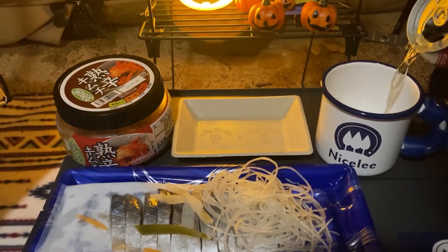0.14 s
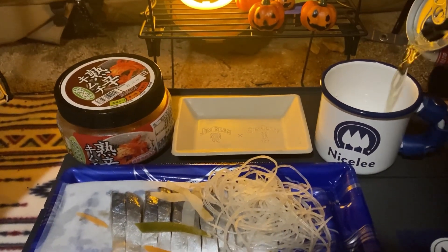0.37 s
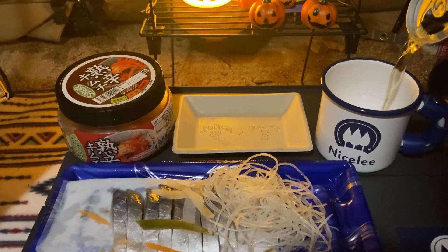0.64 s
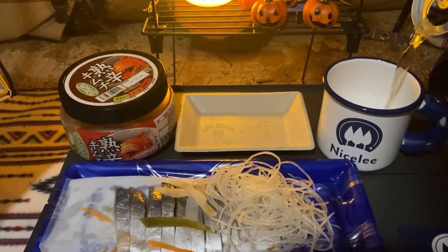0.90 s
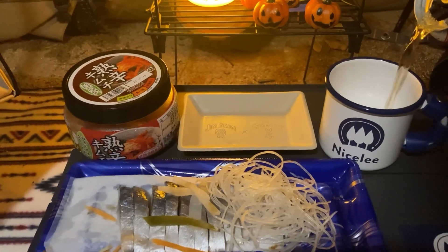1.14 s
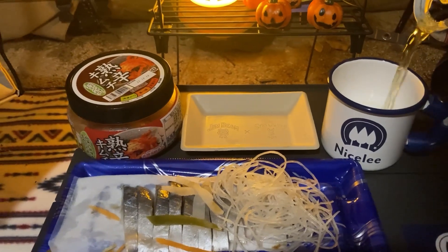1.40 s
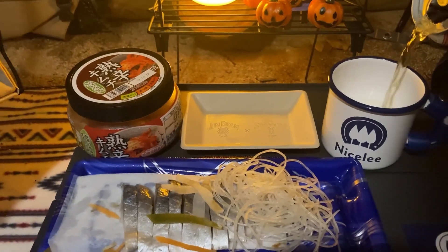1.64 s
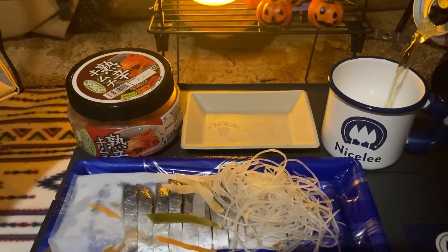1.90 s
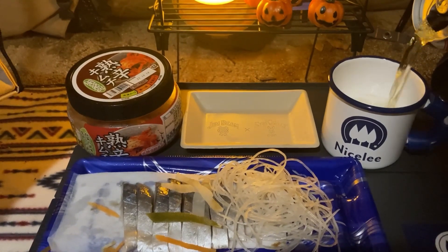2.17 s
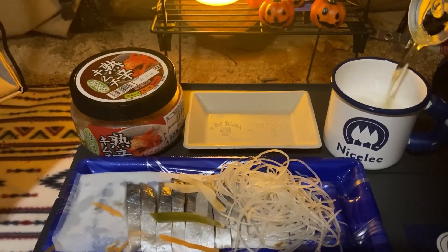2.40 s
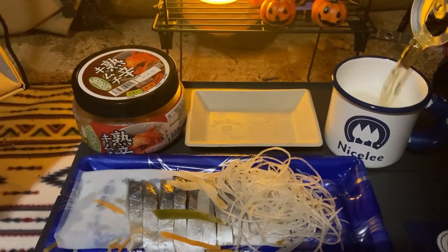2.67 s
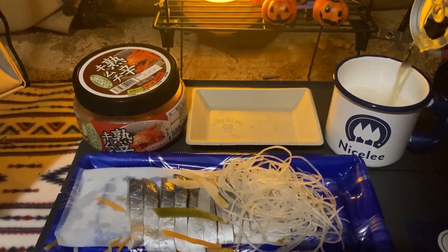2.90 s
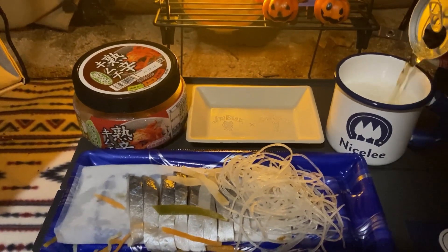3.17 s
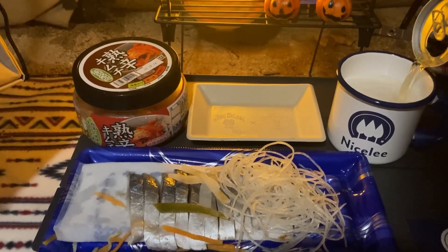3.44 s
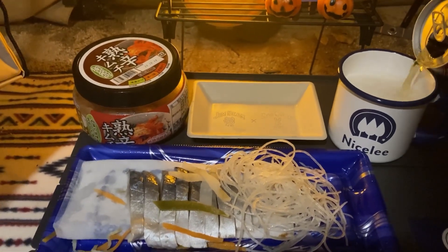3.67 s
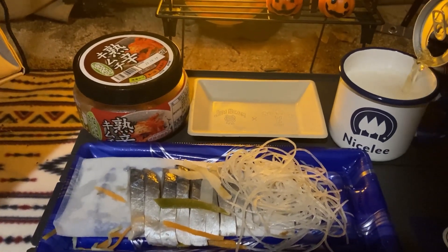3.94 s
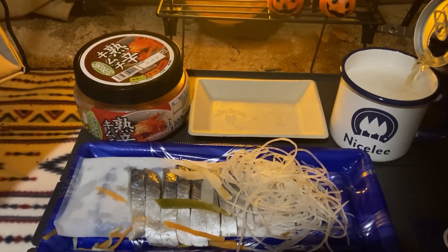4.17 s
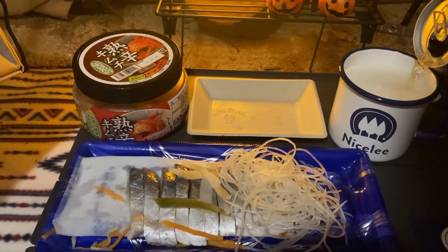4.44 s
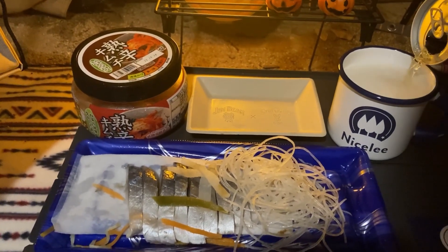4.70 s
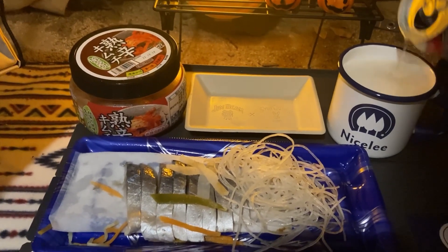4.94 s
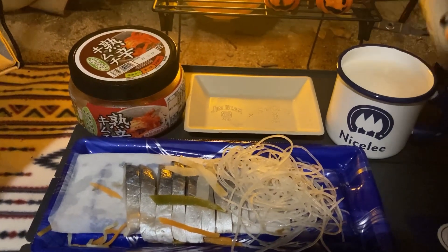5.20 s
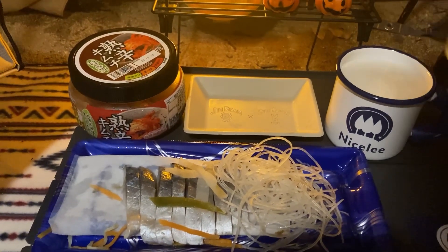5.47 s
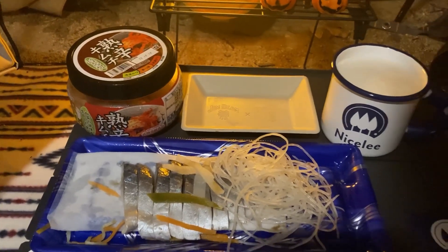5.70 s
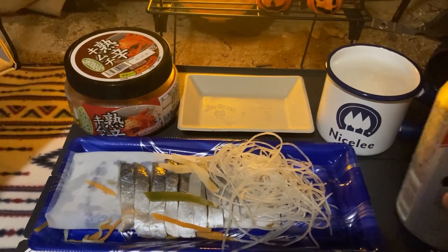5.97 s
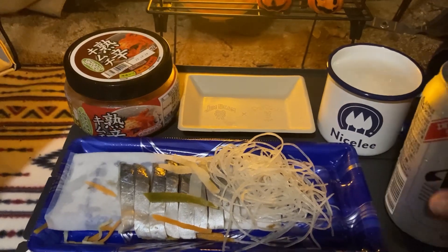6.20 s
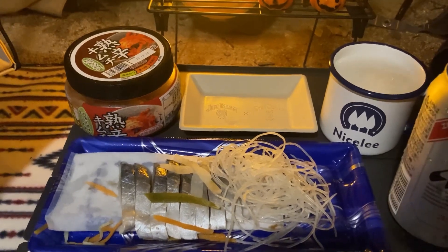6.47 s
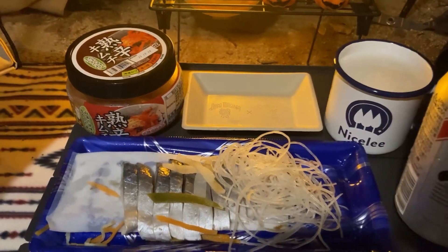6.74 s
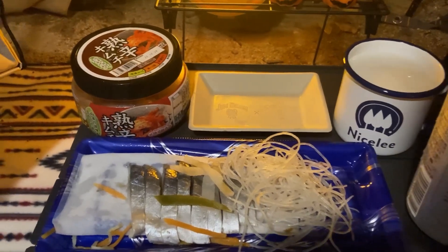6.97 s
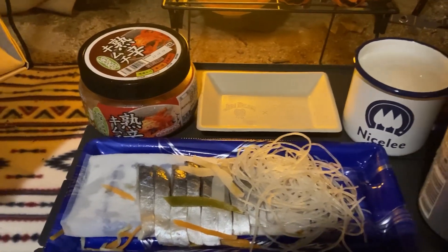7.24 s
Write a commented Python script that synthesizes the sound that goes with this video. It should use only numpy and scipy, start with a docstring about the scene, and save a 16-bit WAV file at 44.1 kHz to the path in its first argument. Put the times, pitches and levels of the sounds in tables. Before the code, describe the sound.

A close, uneven pour of bubbling beer rings the hollow of a metal mug, its tone turning fizzier as foam grows. Light rain patters on the tent roof, irregular dull thumps and dry ticks spread around the listener. A hard drip snaps near the end of the pour; about a second after it ends, an empty can knocks down and scuffs. The space is small, soft and dry, with very quiet crickets, hiss and far rumble.

```python
"""Beer gulps and fizzes from a can into an enamel mug close by, as bubbles ring the mug's air under a growing foam;
later the empty can is knocked down on the table: shell modes, noise cracks at each contact, then a scrape.
Rain taps the taut tent overhead as cloth modes with noise sprays, and thin noise ticks snap near the microphone.
Outside at night, narrow noise bands sing as crickets over a flickering rain hiss and a far low rumble."""
import sys
import numpy as np
from scipy import signal
from scipy.fft import rfft, irfft
from scipy.io import wavfile
from scipy.ndimage import uniform_filter1d

SR = 44100
rng = np.random.default_rng(int(sys.argv[2]) if len(sys.argv) > 2 else 0)


def volts_from_db(level):
    """Convert decibel levels to linear amplitude ratios."""
    exponent = np.asarray(level, float) / 20
    return 10 ** exponent


def dump_mix(stems):
    """Bounce the given channels to the path in sys.argv[1] as a 16-bit WAV at rate SR."""
    frames = np.atleast_2d(stems).T  # one column per channel
    limited = np.clip(frames, -1, 1)  # hard clip at full scale
    pcm = np.round(limited * 32767).astype(np.int16)
    wavfile.write(sys.argv[1], SR, pcm)


N = 324576
T = np.arange(N) / SR
SIDES = np.array([[1], [-1]])  # left, right

# bright noise for splash, scrape and patch, with a notch near 9.5 kHz: [hz, density_db]
BRIGHT_SPECTRUM = [(3500, -29.5), (5000, -0.5), (8600, -3), (9300, -22.5), (10100, -16.5), (10800, -1.5),
                   (14300, -16.5)]
# night rumble and hiss, with a deep notch near 9.5 kHz: [hz, density_db]
NIGHT_SPECTRUM = [(25, -26.5), (60, -2), (101, -1), (183, -4.5), (267, -20.5), (457, -19.5), (3630, -23.5),
                  (5300, -39.5), (6500, -34.5), (8800, -34), (9150, -77.5), (10150, -85.5), (10500, -34),
                  (12900, -35), (13700, -77.5)]
SLOW_BASS_S = 0.0028  # cloth waves near 250 Hz arrive this late; higher ones sooner


def level(x, db):
    """Scale to an rms level."""
    return x * volts_from_db(db) / np.sqrt(np.mean(x ** 2))


def peak(x, db):
    """Scale each row to a peak level."""
    return x * volts_from_db(db)[:, None] / np.abs(x).max(axis=-1, keepdims=True)


def curve(rows):
    """An (s, dB) table as gain, silent outside its span."""
    return volts_from_db(np.interp(T, *np.transpose(rows), left=-150, right=-150))


def colour(x, points):
    """Shape the last axis by a (Hz, dB) spectrum."""
    hz, db = np.transpose(points)
    f = np.fft.rfftfreq(x.shape[-1], 1 / SR) + 1
    gain = volts_from_db(np.interp(np.log(f), np.log(hz), db, left=-90, right=-90))
    return irfft(rfft(x) * gain, x.shape[-1])


def band(x, hz, width):
    """Two-pole resonance, gain 1 at the centre."""
    return signal.lfilter(*signal.iirpeak(hz, hz / width, fs=SR), x)


def walk(rate):
    """Random levels held 1 / rate s and slewed twice; spread near 1."""
    k = int(SR / rate)
    held = np.repeat(rng.standard_normal(N // k + 1), k)
    return 1.42 * uniform_filter1d(uniform_filter1d(held, k), k)[:N]


def ports(x, left_lag, pan_db):
    """Two microphone ports: the left hears it left_lag samples later and pan_db louder."""
    turn = np.exp(-1j * np.pi * np.fft.rfftfreq(len(x)) * left_lag * SIDES)
    return irfft(rfft(x) * turn, len(x)) * volts_from_db(pan_db * SIDES / 2)


def burst(noise, t, rise, fall, tail, tail_db, points):
    """Noise that swells, dies fast and leaves a weaker tail; t starts before the blow."""
    after = np.maximum(t, 0)
    decay = np.exp(-after / fall) + volts_from_db(tail_db) * np.exp(-after / tail)
    return colour(noise * (1 - np.exp(-after / rise)) * decay, points)


def pour(count=9000):
    """Small bubbles burst in uneven gulps under the stream and ring the air of the mug."""
    # air of the mug, low, high and top resonance: [hz, width_hz of the first filter, level_db]
    mug_air = [(800, 240, 0), (1250, 320, 3), (2550, 450, 0)]
    # strength of the stream: [s, gain_db]
    flow = [(0, -57.5), (.35, -56), (.75, -62), (1.1, -59), (2.1, -58), (2.9, -60.5), (3.4, -65.5),
            (4.8, -63)]
    foam_s, foam_rise_s = 2.05, 0.65  # the head of foam closes over the hollow of the mug
    foam_db, foam_early_db, hollow_late_db = 5, -8.5, -15

    u = rng.random((count, 3))
    t = np.arange(512) / SR
    hz = (600 * 5.0 ** u[:, 1])[:, None]
    # each bubble's pitch rises as it dies
    bubbles = np.sin(2 * np.pi * hz * t * (1 + 25 * t)) * np.exp(-hz * t / 1.6)
    bubbles = bubbles * volts_from_db(-2.5 * np.log(u[:, 2:]))
    stream = np.zeros(N + len(t))
    np.add.at(stream, (u[:, :1] * N).astype(int) + np.arange(len(t)), bubbles)
    stream = stream[:N] * volts_from_db(2.5 * walk(25)) * gulps()
    # the foam crackles: a few bursts stand far above the rest
    fizz = stream * volts_from_db(4 * walk(300))

    resonances = []
    for x, (hz, width, db) in zip((stream, stream, fizz), mug_air):
        resonances.append(level(band(band(x, hz, width), hz, 3 * width), db))
    low, high, top = resonances
    foam = 1 / (1 + np.exp((foam_s - T) / foam_rise_s))
    hollow = (low + high) * volts_from_db(hollow_late_db * foam)
    mug = hollow + top * volts_from_db(foam_db + foam_early_db * (1.5 - foam))
    return ports(mug * curve(flow), 11.6, 7.1)


def gulps():
    """The stream drags air under: inside a run its gain dips, jumps at each gulp and dies away."""
    # runs of regular gulps: [start_s, length_s, swing_db above and below the flow before smoothing]
    gulp_runs = [(.097, .21, 13), (1.127, .09, 14), (1.385, .08, 11)]
    gulp_hz, gulp_share = 39, .2  # the share of a gulp's period sets its fall
    db = np.zeros(N)
    for s, length, top_db in gulp_runs:
        phase = ((T - s) * gulp_hz) % 1
        inside = (T > s) * (T < s + length)
        db += inside * top_db * (2 * np.exp(-(phase / gulp_share / 2) ** 2) - 1)
    return volts_from_db(uniform_filter1d(db, size=60))


def can():
    """The first contact rings the thin shell, soon damped by the hand; every contact cracks; a scrape follows."""
    # modes of the thin shell: [hz, relative_db, t60_s before the hand's damping]
    shell_modes = [(320, -8, .05), (480, -4, .05), (683, 2, .08), (931, -3, .06), (1200, -1, .2),
                   (1353, -3, .2), (1552, 0, .13), (1676, -2, .32), (1698, -5, .32), (2093, -3, .22),
                   (2665, 0, .18), (2800, -3, .08), (3385, -11, .12), (4940, -12, .1), (5215, -4, .16)]
    # noise spectrum of a contact: [hz, density_db]
    crack_spectrum = [(500, -17), (2500, -12), (4000, -9), (5400, -4), (8600, -8), (9600, -40), (11000, -5),
                      (13000, -11), (13900, -45)]
    # the can lands in a quick run of contacts: [s, peak_db]
    contacts = [(5.9394, -9), (5.9411, -5), (5.945, -5.5), (5.95, -13.5), (5.956, -19.5)]
    # the can scuffs to rest: [s, gain_db]
    scuff_marks = [(5.99, -57), (6.028, -59), (6.079, -60), (6.103, -54), (6.119, -58)]
    ring_db, scuff_rise_db_s, scuff_fall_db_s = -15, 3000, 300

    ring, cracks = np.zeros((2, N))
    t = np.arange(int(.3 * SR)) / SR - .01  # starts 10 ms before the contact
    after = np.maximum(t, 0)
    hz, mode_db, t60 = np.transpose(shell_modes)[:, :, None]
    decay = np.exp(-np.log(1000) * after / t60)
    modes = volts_from_db(mode_db + ring_db) * decay * np.sin(2 * np.pi * hz * after)
    # the loose shell buzzes, so each mode wavers quickly
    modes = modes * (1 + 4 * uniform_filter1d(rng.standard_normal(modes.shape), 250))
    damping = .22 + np.exp(-(after / .016) ** 2)
    start = int((contacts[0][0] - .01) * SR)
    ring[start:start + len(t)] = modes.sum(axis=0) * (1 - np.exp(-after / .001)) * damping

    for s, db in contacts:
        crack = burst(rng.standard_normal((1, len(t))), t, .0004, .002, .011, -20, crack_spectrum)
        start = int((s - .01) * SR)
        cracks[start:start + len(t)] += peak(crack, np.array([db]))[0]

    grit = rng.standard_normal(N) * volts_from_db(3.2 * walk(170))
    shell_scrape = sum(band(grit, f, 40) / f for f in hz[hz < 3000])
    scrape = level(colour(grit, BRIGHT_SPECTRUM), 0) + level(shell_scrape, 11.6)
    scuffs = 0
    for s, db in scuff_marks:
        scuffs = scuffs + volts_from_db(db - np.maximum(scuff_rise_db_s * (s - T), scuff_fall_db_s * (T - s)))
    scrape = scrape * scuffs * (T > contacts[0][0])
    # the shell and the point of contact lie in slightly different directions
    return ports(ring, 3.0, 1.3) + ports(cracks + scrape, 11.45, 0)


def clear_taps():
    """The clearest taps: raindrops on the fabric, and a few glugs of the pour, all played as drops."""
    # [s, tap_peak_db, thump_pitch_hz, thump_over_tap_db]
    tap_rows = [(.091, -41.5, 370, 4.5), (.326, -44, 510, 11.5), (.497, -38.5, 222, 3),
                (.541, -37.5, 593, -9), (.7, -52, 530, 16.5), (.826, -43.5, 460, 9), (1.067, -42, 353, 4.5),
                (1.086, -35, 216, -1), (1.105, -33.5, 191, 4.5), (1.201, -34.5, 420, -24),
                (1.341, -32, 200, -17), (1.588, -36, 384, -0.5), (1.63, -47.5, 403, 13),
                (1.903, -38.5, 340, 10), (2.22, -33, 220, -3.5), (2.267, -31.5, 353, 0.5),
                (2.323, -30, 463, -10), (2.368, -35, 196, 2), (2.659, -41, 320, 12.5),
                (2.986, -28, 190, -3), (3.183, -35, 560, -6), (3.351, -32.5, 276, 6),
                (3.37, -30.5, 400, -8), (3.468, -33.5, 507, -7), (3.625, -34.5, 510, -12),
                (3.818, -51, 375, 17.5), (4.221, -41.5, 306, 9.5), (4.498, -42.5, 320, 8.5),
                (4.538, -36, 200, 11), (4.654, -36, 464, 2), (5.0, -38, 268, -0.5),
                (5.083, -42.5, 232, 13.5), (5.148, -33, 284, -2), (5.203, -32.5, 345, 0.5),
                (5.785, -55, 310, 25.5), (6.052, -47, 360, 16), (6.236, -34, 201, -20),
                (6.355, -28.5, 530, -4), (6.395, -28, 555, -30), (6.459, -39.5, 404, 1),
                (6.504, -35.5, 226, 0.5), (6.932, -35.5, 189, -2), (7.004, -32.5, 303, 12)]
    return drops(tap_rows)


def patter(count=330):
    """Fainter drops all over the tent, sizes spread exponentially in dB up to a ceiling."""
    faintest_db, spread_db, top_db = -48, 3.5, -41  # tap peaks
    u = rng.random((count, 4))
    tap_db = np.minimum(faintest_db - spread_db * np.log(u[:, 1]), top_db)
    return drops(np.transpose([u[:, 0] * N / SR, tap_db, 250 + 300 * u[:, 2], -6.0 + 6.0 * u[:, 3]]))


def drops(rows):
    """Each drop: a falling thump of the cloth, a ringing tap and a bright spray."""
    # the spray peak of a middling drop; it grows more slowly than the tap
    middling_spray_db, spray_per_tap_db, middling_tap_db = -51.5, .8, -35
    s, tap_db, hz, thump_db = np.transpose(rows)
    t = np.arange(2048) / SR - .005  # starts 5 ms before the blow
    after = np.maximum(t, 0)
    noise = rng.standard_normal((len(s), 2, len(t)))

    # bending waves in cloth are slower when low, so the pitch sags
    late = np.maximum(t - SLOW_BASS_S / 2, 0)
    cycles = hz[:, None] * (late + 0.00086 * (1 - np.exp(-late / 0.00043)))
    thump = cycles ** 2 * np.exp(-cycles / 0.39) * np.sin(2 * np.pi * cycles)
    tap = cloth(after, len(s))
    spray = burst(noise[:, 0], t, 0.00046, 0.0046, 0.016, -9.0, BRIGHT_SPECTRUM)
    spray_db = middling_spray_db + spray_per_tap_db * (tap_db - middling_tap_db)
    mono = peak(thump, tap_db + thump_db) + peak(tap, tap_db) + peak(spray, spray_db)

    out = np.zeros((2, N + 2 * len(t)))
    for k, start in enumerate((s * SR).astype(int)):
        # drops land all over the roof, mostly a little to the left
        place = noise[k, 1, 0]
        out[:, start:start + len(t)] += ports(mono[k], -5.0 - 9.12 * place, 1.1 + 5.1 * place)
    return out[:, int(.005 * SR):][:, :N]


def cloth(after, count, modes=14):
    """Each drop wakes its own handful of cloth modes; all last a few cycles, so the treble dies first."""
    # envelope of the fabric modes: [hz, relative_db]
    tap_envelope = [(350, -7), (1000, -2), (2000, -3), (4500, -6)]
    u = rng.random((modes, count, 3, 1))
    hz, db = np.transpose(tap_envelope)
    out = 0
    for k in range(modes):
        mode_hz = hz[0] * (hz[-1] / hz[0]) ** ((k + u[k, :, 0]) / modes)
        # the treble arrives first, and the spreading drop reaches the modes one by one
        delay = SLOW_BASS_S * 250 / mode_hz + .007 * u[k, :, 2] ** 2
        cycles = mode_hz * np.maximum(after - delay, 0)
        gain = volts_from_db(np.interp(mode_hz, hz, db) - 12.0 * u[k, :, 1]) * (-1) ** k
        out = out + gain * cycles ** 1.5 * np.exp(-cycles / .9) * np.sin(2 * np.pi * cycles)
    return out


def patch():
    """One heavy drip from the roof rings a stiff patch close by: short modes, the low ones late, and a splash."""
    # separate modes of the patch: [hz, relative_db]
    patch_modes = [(606, -1), (985, -1), (1471, -7), (1990, -13), (2607, -10), (3137, -14)]
    start_s, fall_s, ring_peak_db, splash_peak_db = 4.5378, 0.0029, -15.5, -34
    t = np.arange(2048) / SR
    hz, db = np.transpose(patch_modes)[:, :, None]
    after = np.maximum(t - SLOW_BASS_S * 250 / hz, 0)
    modes = volts_from_db(db) * (after * hz > 0) * np.exp(-after / fall_s) * np.sin(2 * np.pi * hz * after)
    ring = modes.sum(axis=0)
    splash = colour(rng.standard_normal(len(t)) * np.exp(-t / (2 * fall_s)), BRIGHT_SPECTRUM)
    drip = peak(np.array([ring, splash]), np.array([ring_peak_db, splash_peak_db])).sum(axis=0)
    out = np.zeros(N)
    out[int(start_s * SR):][:len(t)] = drip
    return ports(out, 1.0, -1.0)


def ticks():
    """Very short treble snaps of resonant noise, perhaps droplets bursting near the phone."""
    # thin bright ticks close by: [s, peak_db]
    tick_rows = [(0.378, -43.5), (0.4627, -33.5), (1.026, -44), (1.2007, -41), (3.467, -42), (4.999, -47),
                 (5.1457, -42.5), (7.1693, -36.5), (7.214, -44)]
    tick_hz, width_hz, fall_s = 11300, 2900, 0.0024
    t = np.arange(512) / SR
    out = np.zeros(N + len(t))
    noise = rng.standard_normal((len(tick_rows), len(t))) * np.exp(-t / fall_s)
    snaps = band(noise, tick_hz, width_hz)
    for (s, db), snap in zip(tick_rows, snaps):
        out[int(s * SR):][:len(t)] += peak(snap[None], np.array([db]))[0]
    return ports(out[:N], 11.26, .1)


def tent(x):
    """The small soft space answers with a short dull tail; only its treble differs between the ports."""
    t = np.arange(int(.15 * SR)) / SR
    mid, side = rng.standard_normal((2, len(t))) * np.exp(-np.log(1000) * t / 0.11)  # t60 0.11 s
    side = colour(side, [(100, -20), (1500, 0), (16000, 0)])
    tail = colour(mid + SIDES * side, [(100, 0), (2000, -2), (14000, -9)])
    tail = tail / np.sqrt((tail ** 2).sum(axis=1, keepdims=True))
    return x + volts_from_db(-13) * signal.fftconvolve(x.mean(axis=0, keepdims=True), tail, axes=1)[:, :N]


def crickets():
    """A chorus of noise-band singers whose close pitches blur into a throbbing band."""
    # singers outside: [hz, rms_db over both ports together]
    singers = [(4170, -60.5), (4320, -58), (4400, -60)]
    out = 0
    for hz, db in singers:
        song = band(band(rng.standard_normal((2, N)), hz, 200), hz, 200) * volts_from_db(1.3 * walk(40))
        out = out + level(song[0] + 0.92 * SIDES * song[1], db)
    return out


def night():
    """Distant rain hiss in half-octave flicker; bass alike on both ports, treble unrelated."""
    mid, side = rng.standard_normal((2, N))
    out = 0
    for hz in 200 * 2 ** np.arange(0, 6.5, .5):
        both = band(mid, hz, hz / 3) + min(hz / 600, 1) * SIDES * band(side, hz, hz / 3)
        out = out + volts_from_db(3.63 * walk(8.6)) * both
    return level(colour(out, [p for p in NIGHT_SPECTRUM if p[0] > 150]), -60)


def rumble():
    """Low noise drone from far off that swells slowly, nearly alike on both ports."""
    # the rumble swells: [centre_s, half_width_s, rise_db]
    swell_rows = [(2.3, 0.49, 5.5), (6.45, 0.098, 4.5)]
    mid, side = rng.standard_normal((2, N))
    low = colour(mid + .16 * SIDES * side, [p for p in NIGHT_SPECTRUM if p[0] < 500])
    swell_db = sum(db * np.exp(-.5 * ((T - s) / width) ** 2) for s, width, db in swell_rows)
    return level(low, -49.5) * volts_from_db(swell_db - 1.0 * SIDES)  # a little louder on the right


def scene():
    """Everything inside rings the tent; the night comes from outside."""
    inside = pour() + can() + clear_taps() + patter() + patch() + ticks()
    return tent(inside) + crickets() + night() + rumble()


def roll_off(x):
    """The treble ends steeply here."""
    return signal.sosfilt(signal.butter(12, 17000, fs=SR, output="sos"), x)


def record(dry):
    """The phone rounds the loudest peak and drops the deepest bass and the top."""
    mic = signal.sosfilt(signal.butter(2, 45, "high", fs=SR, output="sos"), np.tanh(dry))
    mic = signal.sosfilt(signal.butter(12, 15600, fs=SR, output="sos"), mic)
    return roll_off(mic)


dry = scene()
out = record(dry)
dump_mix(out)
```